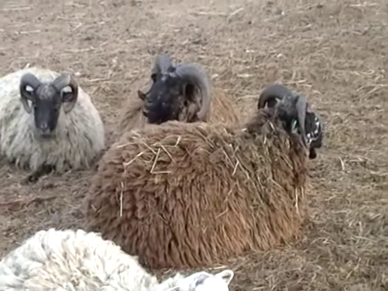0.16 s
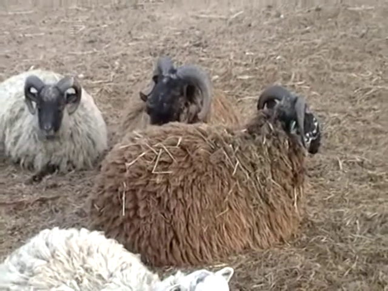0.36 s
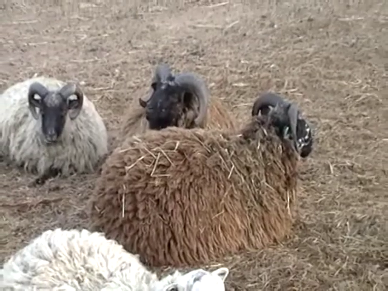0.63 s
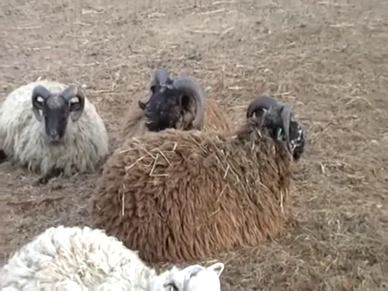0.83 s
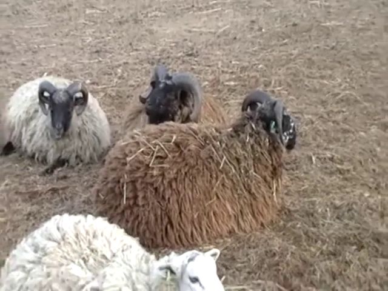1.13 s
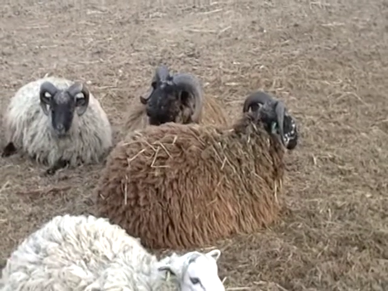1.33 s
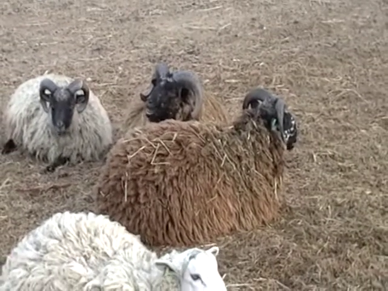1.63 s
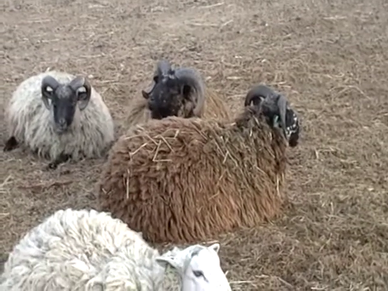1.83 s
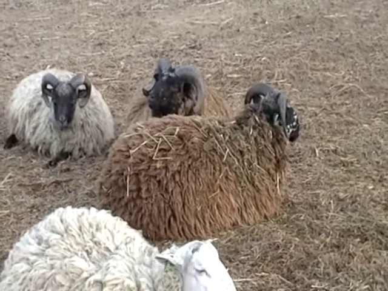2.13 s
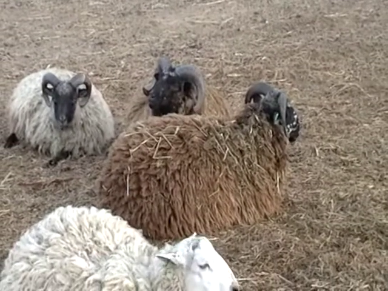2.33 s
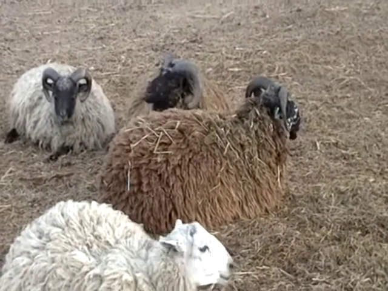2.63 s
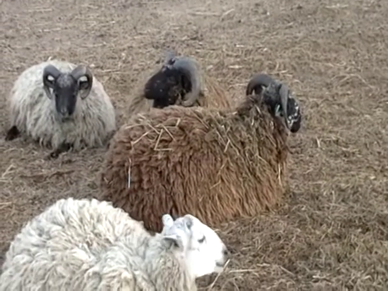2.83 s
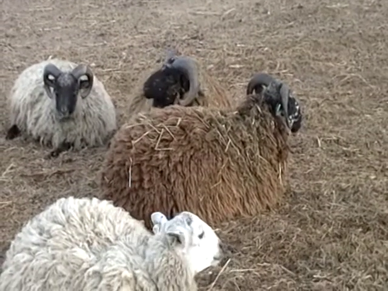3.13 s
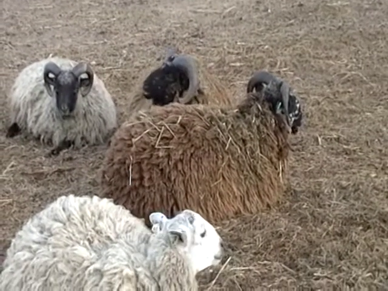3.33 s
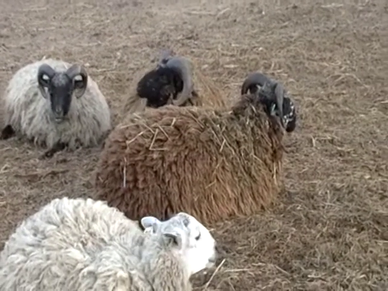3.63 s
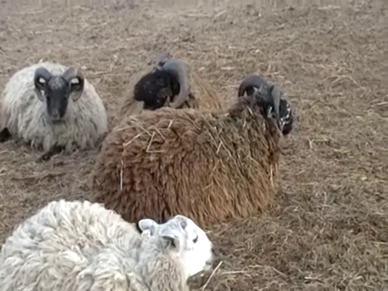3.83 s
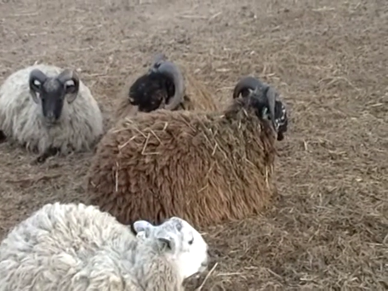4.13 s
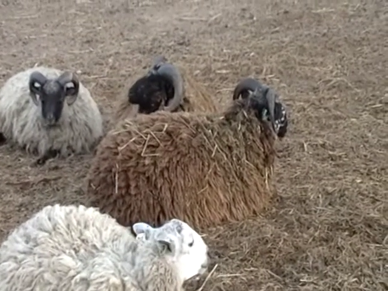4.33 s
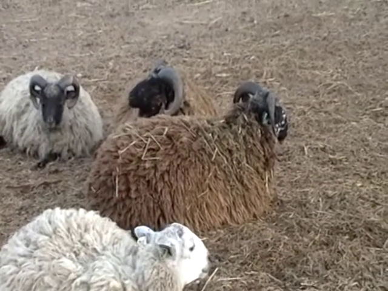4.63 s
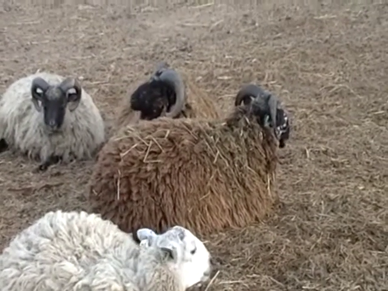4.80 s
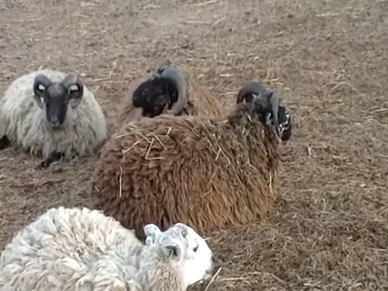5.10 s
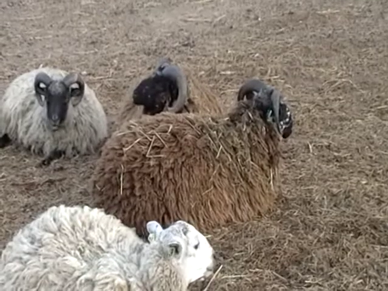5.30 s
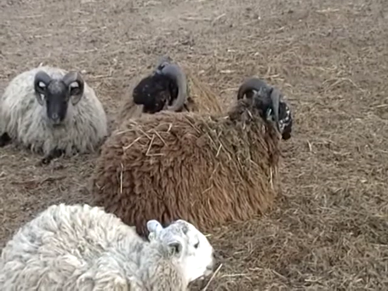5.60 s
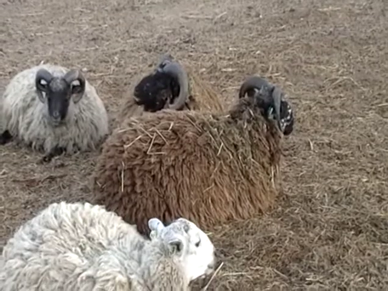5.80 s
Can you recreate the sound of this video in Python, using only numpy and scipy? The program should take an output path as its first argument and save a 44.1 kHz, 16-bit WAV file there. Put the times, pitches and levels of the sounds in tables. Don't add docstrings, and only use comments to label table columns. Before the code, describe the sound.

A rooster crows very close, three hoarse cries and a long falling note, then birds chirp and a distant sheep bleats over a low engine hum.

```python
import sys
import numpy as np
from scipy import signal
from scipy.fft import rfft, irfft
from scipy.io import wavfile
from scipy.ndimage import uniform_filter1d

SR = 44100
rng = np.random.default_rng(int(sys.argv[2]) if len(sys.argv) > 2 else 0)


def log_audio(samples):
    frames = np.atleast_2d(samples).T
    limited = np.clip(frames, -1, 1)
    pcm = np.round(limited * 32767).astype(np.int16)
    wavfile.write(sys.argv[1], SR, pcm)


def magnitude_from_level(level_db):
    exponent = np.asarray(level_db, float) / 20
    return 10 ** exponent


N = 262836
T = np.arange(N) / SR
F = np.fft.rfftfreq(N, 1 / SR)

# (time [s], pitch [Hz], level [dB], beak opening [dB])
SHORT_CALLS = [
    [(.745, 651.8, -35.5, 1.5), (.775, 540.8, -20.5, -1.5), (.809, 616.5, -19, -5), (.812, 675, -27, 3),
     (.816, 778.7, -11.5, -4), (.86, 768, -13.5, 4), (.884, 587.4, -21, 2), (.95, 724.6, -50.5, 3.5)],
    [(.98, 495.9, -31, 0), (1.008, 560.8, -19, -4), (1.016, 700, -13, -2), (1.031, 824.2, -12.5, -7.5),
     (1.079, 854.8, -11.5, -1), (1.125, 816.5, -12.5, -1.5), (1.16, 667.3, -15.5, 0), (1.192, 563, -22, -4),
     (1.209, 590, -19, -2)],
    [(1.21, 572.6, -36.5, -2.5), (1.216, 650, -12.5, -9), (1.256, 725, -10, -8), (1.266, 772, -16, -0.5),
     (1.385, 792, -13, 1), (1.5, 812.3, -11.5, -0.5), (1.6, 855.4, -12, 2), (1.634, 698.4, -14.5, 2.5),
     (1.644, 667, -16, 1)],
]
LONG_CALL = [
    [(1.646, 547.7, -24.5, 0.5), (1.817, 555.2, -24, -3), (1.93, 523.6, -25.5, 3.5),
     (2.085, 515.3, -26.5, 5), (2.301, 492.2, -27, -3), (2.383, 454, -26.5, -0.5),
     (2.427, 425.6, -28.5, -9.5), (2.441, 387, -26.5, -15.5), (2.471, 358.3, -26, -15)],
]
CROW = SHORT_CALLS + LONG_CALL
# (start [s], end [s], roughness [0-1], rattle rate [Hz])
HOARSE = [(.74, .775, .2, 90), (.812, .95, .36, 46), (.975, 1.01, .24, 90), (1.01, 1.065, .38, 58),
          (1.145, 1.195, .36, 90), (1.215, 1.255, .3, 60), (1.26, 1.495, .15, 36), (1.333, 1.35, .45, 90),
          (1.38, 1.4, .33, 90), (1.498, 1.62, .42, 88), (1.66, 1.96, .055, 40), (2.435, 2.55, .38, 80)]
DOUBLING_S = 2.093


def on_hz(table, hz=F):
    f, v = np.transpose(table)
    return np.interp(np.log(hz + 1), np.log(f + 1), v)


def band(x, lo_hz, hi_hz):
    return signal.sosfilt(signal.butter(4, [lo_hz, hi_hz], "bandpass", fs=SR, output="sos"), x)


def unit(x):
    return x / np.sqrt(np.mean(x ** 2))


def flutter(count, lo_hz, hi_hz):
    rates = signal.butter(2, [lo_hz, hi_hz], "bandpass", fs=SR, output="sos")
    return unit(signal.sosfilt(rates, rng.standard_normal(count)))


def fade(t, t0, t1, edge):
    return np.clip(np.minimum(t - t0, t1 - t) / edge + .5, 0, 1)


def add(out, s, sound):
    i = int(s * SR)
    sound = sound[max(-i, 0):N - i]
    out[max(i, 0):max(i, 0) + len(sound)] += sound


def crow():
    # (frequency [Hz], level [dB])
    beak_wide = [(210, -77.5), (350, -52), (499, -34), (694, 8.5), (804, 0), (1010, -12), (1430, -9),
                 (1630, 5.5), (1890, -7), (2200, -22.5), (2540, -41.5), (2870, -26), (3120, -6),
                 (3800, -42), (4180, -47.5), (4910, -21), (5700, -35.5)]
    # (frequency [Hz], level [dB])
    beak_long = [(300, -13.5), (560, -9), (750, 0), (1080, -3.5), (1300, -3.5), (1600, -5), (2100, -4.5),
                 (2400, -31.5), (2800, -11), (3250, -8), (3450, -44), (4080, -48), (4450, -18.5),
                 (5030, -20), (5500, -38.5)]
    # (time [s], centre [Hz], depth [dB])
    pocket = [
        (1.64, 2200, 0),
        (1.655, 2200, -14),
        (1.71, 2150, -16),
        (1.73, 1700, -11),
        (1.81, 1650, -11),
        (1.845, 2150, -9),
        (1.9, 2200, 0),
    ]
    # (offset [dB], share of the beak opening [0-1])
    groups = [
        (0, 0.05),
        (0.101, 0.9),
        (0.1, .9),
        (0.1, 0.7),
    ]
    group_edges_hz = [300, 1250, 2400, 3800, 17000]
    chest_below_hz, pocket_width_hz = 700, 330

    rows = np.vstack(CROW)
    span = slice(int(.7 * SR), int(2.55 * SR))
    t = T[span]
    hz, db, open_db = (np.interp(t, rows[:, 0], column) for column in rows.T[1:])
    rough, half = hoarseness(t)
    hz = hz * (1 - 0.028 * fade(t, DOUBLING_S, 9, .006))

    low_register = np.clip((640 - hz) / 60, 0, 1) * np.clip((hz - 350) / 70, .55, 1)
    chest_db = 3 * low_register * fade(t, 0, 2.1, .15) + 4.5 * low_register * (t < 1.3)
    pocket_s, *pocket_columns = np.transpose(pocket)
    pocket_hz, pocket_db = (np.interp(t, pocket_s, column) for column in pocket_columns)

    chop = rattle(t)
    hz = hz * (1 + 0.059 * (chop - 1) * fade(t, 1.4, 1.5, 0.016))
    voice = 0
    for beak, tube, share in ((beak_wide, .7, 1 - low_register), (beak_long, .5, low_register)):
        def membrane_db(f):
            swallowed_db = pocket_db * np.exp(-((f - pocket_hz) / pocket_width_hz) ** 2)
            return (1 - tube) * throat(beak, f) + chest_db * (f < chest_below_hz) + swallowed_db

        source = share * folds(hz, rough, half, membrane_db, 9700, breath_db=-40.0 + 28.5 * rough)
        rush = share * breath(rough, hz, low_register, count=len(t))
        colour_db = throat(beak, np.fft.rfftfreq(len(t), 1 / SR))
        coloured = rfft(source * chop) * magnitude_from_level(tube * colour_db) + rfft(rush * chop) * magnitude_from_level(colour_db)
        voice = voice + irfft(coloured, len(t))

    voice = sum(band(voice, lo, hi) * magnitude_from_level(group_db + share * open_db)
                for lo, hi, (group_db, share) in zip(group_edges_hz, group_edges_hz[1:], groups))
    power = uniform_filter1d(uniform_filter1d(voice ** 2, size=1300), size=1300)
    out = np.zeros(N)
    out[span] = voice / np.sqrt(power + 1e-12) * magnitude_from_level(db)

    sag = np.clip((T - 2.1) / .2, 0, 1)
    tight = signal.sosfiltfilt(signal.butter(4, 470, "highpass", fs=SR, output="sos"), out)
    out = sag * out + (1 - sag) * tight
    syllables = fade(T, .756, 0.94, 0.0077) + fade(T, 0.98, 2.5, 0.012)
    return out * syllables * fade(T, 0, 2.478, .03)


def hoarseness(t):
    clear = [
        .14,
        .075,
        .12,
        .025,
    ]
    syllable = np.searchsorted([call[0][0] for call in CROW], t) - 1
    rough = np.array(clear)[np.clip(syllable, 0, 3)]
    for t0, t1, much, _ in HOARSE:
        rough = np.maximum(rough, much * fade(t, t0, t1, .025))
    return rough, .55 * rough + .085 * fade(t, DOUBLING_S, 9, .012)


def folds(hz, rough, half, gain_db, top_hz, breath_db):
    count = len(hz)
    wander = 1.5 * flutter(count, 18, 70) + .75 * rough * flutter(count, 70, 400)
    phase = 2 * np.pi * np.cumsum(hz) / SR + rough * wander
    out = 0
    for k in range(1, int(top_hz / hz.min())):
        alternate = 1 + 2 * half * np.cos(phase / 2) / (1 + (k * hz / 2600) ** 4)
        smear = uniform_filter1d(rng.standard_normal(count), size=60) * np.sqrt(60)
        air = magnitude_from_level(np.minimum(breath_db + 9 * np.log2(k), -5)) * smear
        steps = rng.standard_normal(count // 5000 + 2)
        swell_db = 2.5 * np.interp(np.arange(count) / 5000, np.arange(len(steps)), steps)
        strength = magnitude_from_level(gain_db(k * hz) + swell_db) * (k * hz < top_hz)
        out = out + strength * (alternate + air) * np.cos(k * phase + k * k / 3)
    shake = .6 * flutter(count, 28, 80) + 2 * rough * flutter(count, 80, 250)
    return out * (1 + .8 * np.tanh(1.3 * rough * shake))


def throat(low, hz):
    # (frequency [Hz], level [dB])
    beak_top = [(6000, -31), (6700, -40), (7700, -16), (8200, -35), (8750, -24), (9500, -37),
                (10500, -35.5), (11500, -39.5), (12000, -37), (12700, -45), (13800, -32.5), (14700, -37),
                (15400, -52)]
    low = [row for row in low if row[0] < 5800]
    return on_hz(low + [(f, db - 15.5) for f, db in beak_top], hz)


def breath(rough, hz, low_register, count):
    puff = 1 + 0.71 * np.cos(2 * np.pi * np.cumsum(hz) / SR)
    f = np.fft.rfftfreq(count, 1 / SR)
    tilt_db = 4 * np.log2(f / 2000 + 0.044)
    air = irfft(rfft(rng.standard_normal(count)) * magnitude_from_level(tilt_db), count)
    hiss = band(air, 9400, 16500) * magnitude_from_level(-3 + 7 * low_register)
    return puff * (air * magnitude_from_level(-23.5 + 15 * rough) + hiss)


def rattle(t):
    out = np.ones(len(t))
    for t0, t1, much, rate_hz in HOARSE:
        flap = np.cos(2 * np.pi * rate_hz * (t - t0 - .006) + .5 * flutter(len(t), 10, 40))
        out = out * (1 + np.minimum(0.88 * much, .9) * fade(t, t0, t1, 0.0072) * flap)
    return out


def sheep():
    # (time [s], pitch [Hz], level [dB])
    bleat = [
        (3.72, 192, -61),
        (3.782, 206, -56.5),
        (3.81, 189.8, -54.5),
        (3.845, 209, -56),
        (4.044, 209.6, -55),
        (4.062, 203.8, -53),
        (4.33, 213.4, -56),
        (4.476, 221.7, -62),
        (4.7, 217, -65.5),
    ]
    # (frequency [Hz], level [dB])
    mouth = [(210, -10), (420, -20.5), (620, -14.5), (840, -1.5), (1050, -20.5), (1260, -19), (1460, -12),
             (1670, -9), (2100, -14), (2500, -26.5), (2950, -15.5), (3900, -17.5), (4700, -31),
             (5400, -28.5), (6300, -32.5), (7000, -44)]
    # (frequency [Hz], level [dB])
    nose = [(420, -15), (650, -2), (870, -16), (1500, -23), (1950, -8), (2400, -20.5), (3500, -11),
            (7000, -37)]
    s, *columns = np.transpose(bleat)
    span = slice(int(s[0] * SR), int(s[-1] * SR))
    t = T[span]
    hz, db = (np.interp(t, s, column) for column in columns)
    hz = hz * (1 + .0045 * flutter(len(hz), 8, 20))
    bright_db = 2 - 0.5 * (t - s[0])
    shut = fade(t, 4.41, 9, 0.11)
    rough = .012 + .05 * np.exp(-((t - 3.78) / .04) ** 2)

    def colour_db(f):
        opened = on_hz(mouth, f) + bright_db * (f > 2300)
        return (1 - shut) * opened + shut * on_hz(nose, f)

    voice = folds(hz, rough, 0, colour_db, 7000, breath_db=-50.0)
    out = np.zeros(N)
    out[span] = voice * magnitude_from_level(db + 4.0) * np.sqrt(2) * fade(t, s[0] + 0.019, s[-1] - .02, 0.051)
    return out


def whistle(hz, db, u, lean, roundness):
    swell = np.sin(np.pi * u ** lean) ** roundness
    return np.sqrt(2) * magnitude_from_level(db) * swell * np.sin(2 * np.pi * np.cumsum(hz) / SR)


def songbirds():
    # (time [s], length [s], first [Hz], last
    # [Hz], level [dB])
    slides = [(0, .06, 4430, 2830, -50.5), (.31, .013, 4900, 5500, -64), (2.538, .022, 3550, 4000, -62),
              (2.558, .009, 3950, 4630, -62), (3.088, .025, 6750, 7150, -72), (3.232, .03, 6850, 7200, -72),
              (3.385, .035, 6950, 7150, -73), (2.814, .01, 5200, 4500, -66), (2.59, 0.026, 6900, 7770, -72),
              (3.617, 0.0079, 1840, 1395, -57.5), (3.62, 0.21, 196.5, 199, -56),
              (4.263, 0.015, 1740, 1430, -48.5), (4.284, 0.016, 1500, 1920, -56),
              (4.347, 0.0088, 1490, 1850, -46.5), (4.401, 0.0069, 2060, 1490, -46),
              (4.452, 0.012, 1380, 1820, -49), (4.79, 0.4, 4246, 4230, -71.5),
              (5.093, 0.062, 5470, 4950, -60), (5.176, 0.25, 1917, 1552, -59.5),
              (5.36, 0.14, 3340, 2750, -65), (5.503, 0.03, 2850, 3500, -68),
              (5.793, 0.013, 6760, 7250, -60), (5.802, 0.015, 7100, 7500, -67),
              (5.79, 0.028, 3970, 2960, -64), (5.823, 0.027, 2550, 3200, -58),
              (5.848, 0.021, 3150, 2400, -58)]
    # (time after its start [s], length [s], first [Hz], last [Hz], level [dB])
    phrase = [
        (0, .009, 4880, 7976, -61),
        (0.022, 0.013, 7070, 8200, -55.5),
        (0.041, 0.015, 5845, 5620, -53.5),
        (0.052, .007, 5614, 4190, -51),
        (.087, .009, 4230, 4700, -51),
        (.093, .015, 4680, 4780, -48.5),
        (.106, .005, 5196, 4250, -51.5),
        (.113, .005, 5170, 4250, -51.5),
    ]
    # (time [s], level [dB])
    phrase_starts = [
        (.428, 1.5),
        (.574, 2.5),
        (.72, 1),
        (.866, 3.5),
    ]
    # (time [s], length [s], first [Hz], level [dB])
    held = [(-.06, 0.16, 3750, -47), (.163, .074, 5590, -68), (0.588, .08, 5560, -68),
            (0.214, 0.072, 7200, -56), (0.314, 0.078, 3920, -61), (2.565, 0.05, 3850, -67),
            (2.78, .05, 7440, -74), (2.854, 0.0692, 7000, -70.5), (2.83, 0.062, 6870, -75),
            (3.408, 0.053, 3160, -69.5), (4.177, 0.043, 4702, -52.5), (4.288, 0.039, 1975, -52.5),
            (4.406, .014, 2430, -54), (3.625, 0.029, 1430, -63.5), (5.164, 0.095, 5110, -61),
            (5.793, 0.055, 3690, -61), (5.853, .14, 3440, -56), (5.835, 0.068, 4930, -63),
            (5.9, 0.058, 4800, -68.5)]
    # (time [s], first [Hz], last [Hz], level [dB])
    chips = [(2.969, 5650, 4020, -63.5), (4.905, 7600, 4560, -58), (4.925, 6280, 3890, -52),
             (5.288, 8000, 5200, -64), (5.307, 7100, 5070, -58.5), (5.317, 6300, 5160, -62),
             (5.521, 6800, 5260, -67), (5.529, 6300, 5500, -63), (5.541, 4800, 3400, -55),
             (5.701, 7100, 5130, -62.5), (5.716, 6300, 5030, -66), (5.731, 6100, 4930, -59),
             (5.746, 6200, 5130, -65.5), (5.845, 6500, 5100, -64), (5.86, 6500, 5200, -68),
             (5.876, 6500, 5100, -66), (5.891, 6400, 5100, -67), (5.949, 8050, 7660, -73.5)]
    # (time [s], length [s], edge [Hz], middle [Hz], level [dB])
    bows = [
        (0.214, 0.086, 7680, 7430, -55.5),
        (4.369, .03, 1660, 1180, -59.5),
        (4.426, 0.03, 1780, 1033, -57),
        (5.655, 0.032, 7950, 7600, -77),
        (5.816, 0.02, 3510, 3800, -57),
    ]
    # (time [s], level [dB])
    hooks = [
        (.366, -46.5),
        (5.236, -60.5),
        (5.522, -58),
        (5.731, -57),
    ]
    hook_hz = [
        3680,
        3330,
        2590,
    ]
    # (time [s], length [s], first [Hz], level [dB])
    falls = [
        (4.04, .045, 4620, -56.5),
        (4.2, 0.059, 4650, -50),
        (4.345, 0.058, 4210, -49),
        (4.476, 0.064, 4130, -51),
        (4.625, 0.059, 3950, -56.5),
        (4.747, 0.039, 4210, -67.5),
    ]

    slides = slides + [(s + after, length, a, c, db + more)
                       for s, more in phrase_starts for after, length, a, c, db in phrase]
    slides += [(s, length, hz, 0.97 * hz, db) for s, length, hz, db in held]
    slides += [(s, .011, a, c, db) for s, a, c, db in chips]
    notes = [(s, length, a, (a + c) / 2, c, db) for s, length, a, c, db in slides]
    notes += [(s, length, a, b, a, db) for s, length, a, b, db in bows]
    notes += [(s, 0.018, *hook_hz, db) for s, db in hooks]

    out = np.zeros(N)
    for s, length, first, db in falls:
        u = np.arange(int(length * SR)) / (length * SR)
        hz = first + (3170 - first) * np.sin(np.pi / 2 * u ** 1.3) ** 2
        add(out, s, whistle(hz, db, u, 1.25, .6))
    for s, length, a, b, c, db in notes:
        u = np.arange(int(length * SR)) / (length * SR)
        hz = a * (1 - u) * (1 - 2 * u) + 4 * b * u * (1 - u) + c * u * (2 * u - 1)
        add(out, s, whistle(hz, db, u, 1.1, 0.49))
    return out


def trill():
    # (time [s], carrier [Hz], buzz rate [Hz])
    buzzing = [
        (5.201, 4710, 331),
        (5.224, 4730, 331),
        (5.26, 4560, 328),
        (5.311, 4710, 324),
        (5.675, 4960, 319),
    ]
    s, *columns = np.transpose(buzzing)
    hz, buzz_hz = (np.interp(T, s, column) for column in columns)
    buzz = 2 * np.pi * np.cumsum(buzz_hz * (1 + 0.023 * flutter(N, 10, 60))) / SR
    shake_hz = 20 + 55 * np.exp(-((T - s[0]) / .07) ** 2)
    hz = hz + flutter(N, 27.0, 194) * shake_hz
    carrier = np.sin(2 * np.pi * np.cumsum(hz) / SR + 1.07 * np.sin(buzz))
    return carrier * (1 + 0.14 * np.cos(buzz)) * magnitude_from_level(-50.5) * fade(T, s[0], s[-1], 0.041)


def ticks():
    # (time [s], length [s], centre [Hz], width [Hz], level [dB])
    bursts = [(0.121, 0.0052, 680, 500, -42.5), (.119, .004, 2800, 3600, -44),
              (.433, 0.01, 1600, 1212, -47.5), (0.323, 0.032, 3900, 900, -56), (1.8, .2, 620, 280, -42),
              (2.61, 0.075, 3370, 600, -54), (2.385, .004, 12000, 6000, -66),
              (4.183, .003, 9500, 2500, -68), (.012, .003, 7500, 3500, -64), (3.29, .02, 5100, 670, -69),
              (3.385, .025, 5250, 600, -69), (3.488, .015, 5300, 600, -67), (3.69, .03, 5150, 500, -65),
              (3.58, 0.14, 220, 160, -54.5), (3.75, .014, 3420, 400, -52), (3.785, .03, 3400, 600, -50),
              (4.917, 0.067, 3800, 1130, -57), (5.22, 0.11, 300, 180, -55), (5.34, 0.052, 300, 200, -51.5),
              (5.738, .14, 4500, 4920, -55.5), (5.785, 0.079, 3500, 897, -50),
              (5.82, 0.045, 2700, 704, -51.5)]
    out = np.zeros(N)
    for s, length, hz, width, db in bursts:
        u = np.arange(int(3 * length * SR)) / (length * SR)
        grain = unit(band(rng.standard_normal(SR), hz - width / 2, hz + width / 2))[-len(u):]
        add(out, s, magnitude_from_level(db) * grain * np.minimum(8 * u, 1) * np.exp(-1.5 * u))
    return out


def echo(x, t60, db):
    t = T[:SR]
    tail = rng.standard_normal((2, SR)) * np.exp(-np.log(1000) * t / t60) * (t > .012)
    tail = signal.sosfilt(signal.butter(1, 5000, fs=SR, output="sos"), tail)
    tail = tail / np.sqrt(np.sum(tail[0] ** 2))
    return signal.fftconvolve(x[None], tail, axes=1)[:, :N] * magnitude_from_level(db)


def diesel():
    cylinder_db = [
        -4.5,
        -8,
        -7,
        -3.5,
    ]
    # (frequency [Hz], level [dB per Hz])
    exhaust = [(26, -39), (45, -10), (110, 6.5), (167, -1), (318, -11.5), (450, -20), (580, -47),
               (990, -120)]
    firing_hz = 54.15
    chance = rng.standard_normal((400, 2))
    turns = np.cumsum(1 + .008 * chance[:, 0]) + np.resize([0, .04, 0, -.03], 400)
    at = (turns * SR / firing_hz).astype(int) - 600
    strength = magnitude_from_level(np.resize(cylinder_db, len(at)) + 1.5 * chance[:, 1])
    keep = (at >= 0) & (at < N)
    pulses = np.zeros(N)
    pulses[at[keep]] = strength[keep]
    return unit(irfft(rfft(pulses) * magnitude_from_level(on_hz(exhaust)) * (F < 450), N)) * magnitude_from_level(-55.5)


def yard():
    # (frequency [Hz], level [dB per Hz])
    air = [(18, -51.5), (30, -16.5), (111, -9.5), (237, -15.5), (410, -20), (492, -39), (607, -21),
           (852, -22), (1170, -29.5), (1510, -26), (3590, -36), (3990, -35), (4310, -34.5), (6900, -42),
           (15500, -52)]
    # (frequency [Hz], likeness [-1 to 1])
    likeness = [
        (60, 1),
        (130, 0.82),
        (290, -0.2),
        (640, 0.31),
        (1410, -0.6),
        (3100, 0.46),
        (6820, 0.21),
        (15000, -0.37),
    ]
    alike = np.clip(on_hz(likeness), -.99, .99)
    mid, side = (rfft(rng.standard_normal(N)) * magnitude_from_level(on_hz(air)) * np.sqrt(1 + sign * alike)
                 for sign in (1, -1))
    sides = irfft(np.array([mid + side, mid - side]), N)
    return unit(sides) * magnitude_from_level(-55 + 1.2 * flutter(N, .3, 2.6))


def place(x, pan_db):
    return x * magnitude_from_level(np.array([[pan_db], [-pan_db]]) / 2)


def at_microphone(cock):
    # (frequency [Hz], level [dB])
    port_db = [(60, -9), (110, -8), (200, -7.5), (380, 2.5), (700, -2.5), (1290, 3), (2380, 6.5),
               (4400, 1.5), (8120, 1.5), (15000, -1)]
    # (frequency [Hz], phase [radians])
    port_rad = [(0, 0), (1980, 1.49), (2580, 0.48), (3100, 0.17), (5430, 0.68), (6630, 1.4), (9040, 0.98),
                (10600, 1.2), (12000, 1.5), (15200, 2)]
    port = magnitude_from_level(on_hz(port_db) / 2) * np.exp(.5j * np.interp(F, *np.transpose(port_rad)))
    return irfft(rfft(cock) * np.array([port, 1 / port]), N)


def scene():
    cock, far = crow(), sheep()
    song = songbirds() + trill() + ticks()
    echoes = echo(cock, .22, -20) + echo(band(cock, 1000, 6000), .6, -24)
    echoes = echoes + echo(song, 0.41, -11.0) + echo(far, .5, -15)
    around = place(far, 5.9) + place(song, 4.0) + place(diesel(), -0.94)
    return at_microphone(cock) + around + echoes + yard()


def low_pass(x):
    return signal.sosfilt(signal.butter(12, 15670, fs=SR, output="sos"), x)


def record(dry):
    # (frequency [Hz], level [dB])
    drive = [
        (3905, -80),
        (4230, -88.5),
    ]
    whine = sum(magnitude_from_level(db) * np.sqrt(2) * np.sin(2 * np.pi * hz * T) for hz, db in drive)
    rounded = np.tanh(.85 * dry) / .85
    bass_cut = signal.butter(6, 47, "highpass", fs=SR, output="sos")
    mix = signal.sosfilt(bass_cut, rounded + whine)
    return low_pass(mix)


dry = scene()
out = record(dry)
log_audio(out)
```